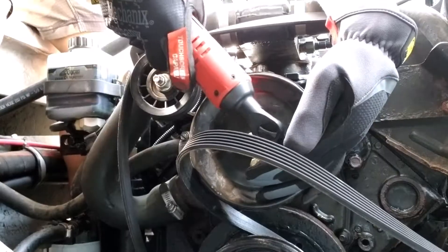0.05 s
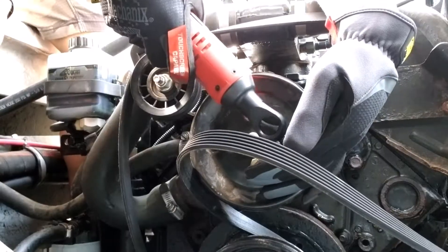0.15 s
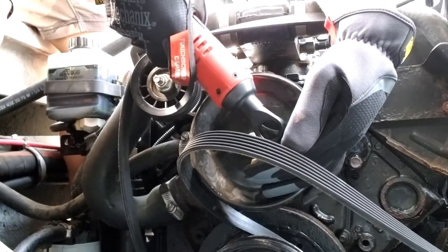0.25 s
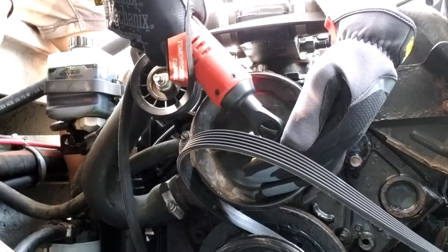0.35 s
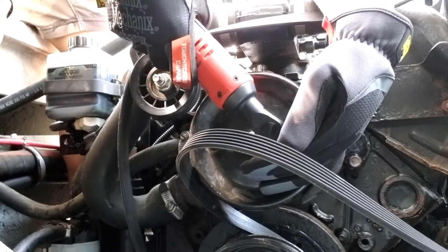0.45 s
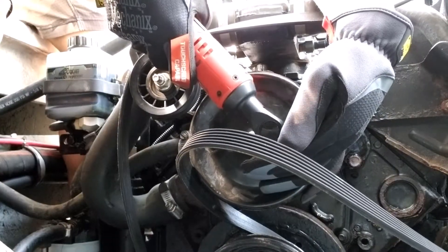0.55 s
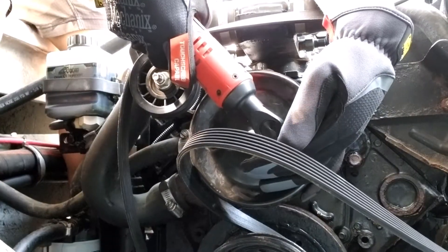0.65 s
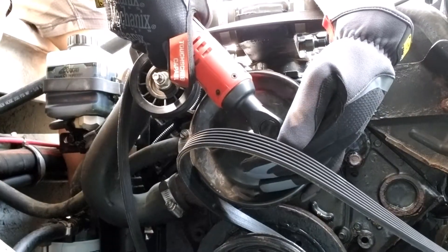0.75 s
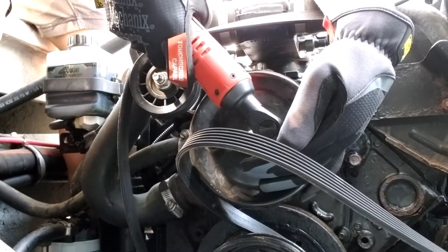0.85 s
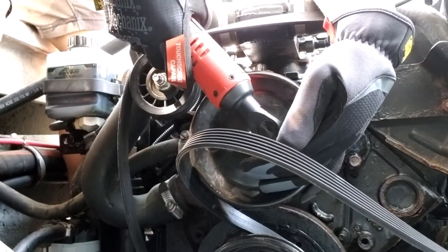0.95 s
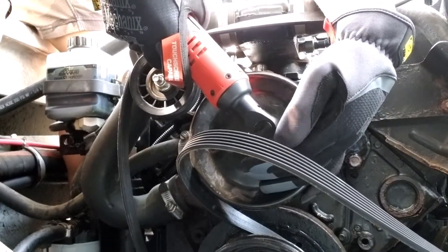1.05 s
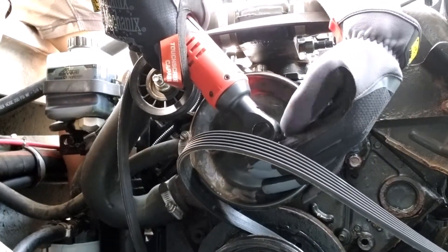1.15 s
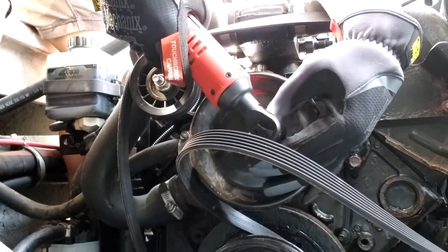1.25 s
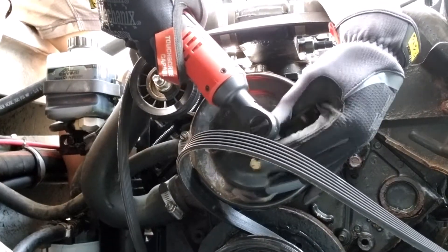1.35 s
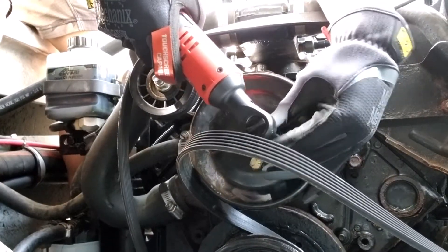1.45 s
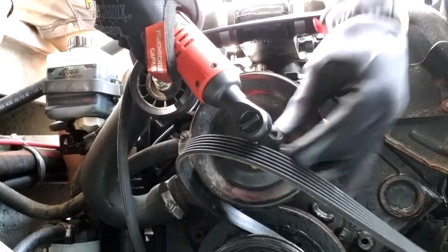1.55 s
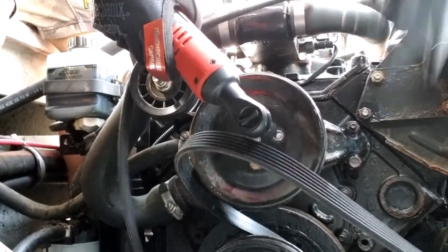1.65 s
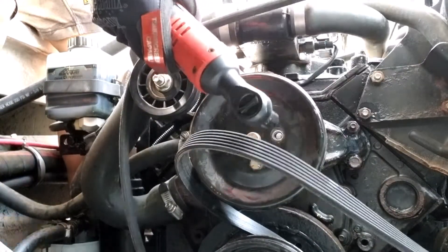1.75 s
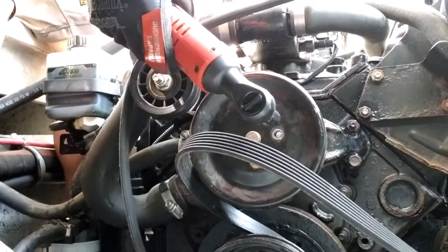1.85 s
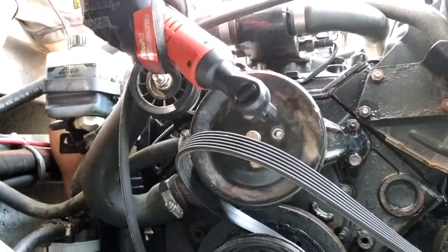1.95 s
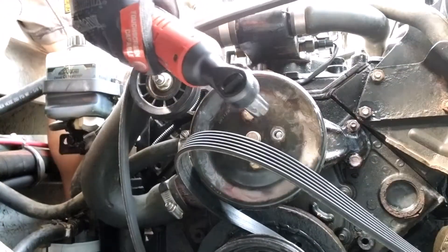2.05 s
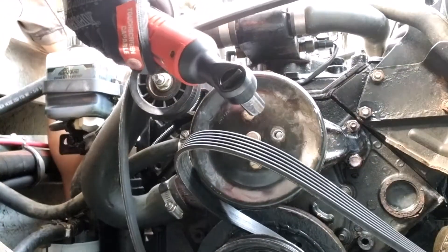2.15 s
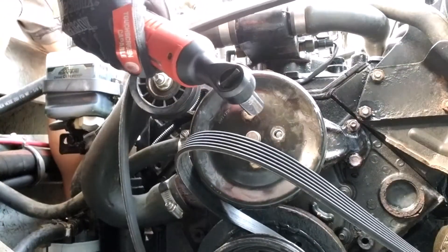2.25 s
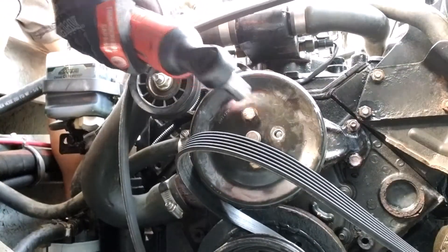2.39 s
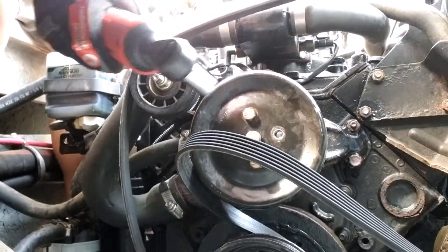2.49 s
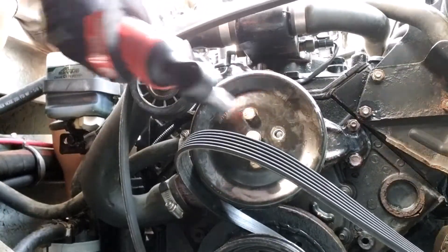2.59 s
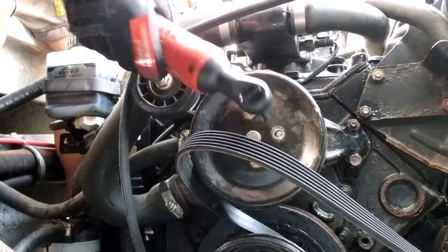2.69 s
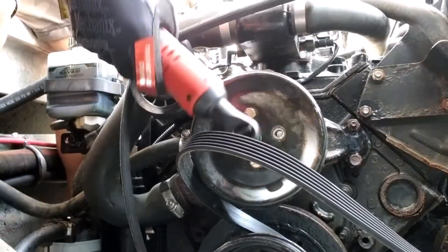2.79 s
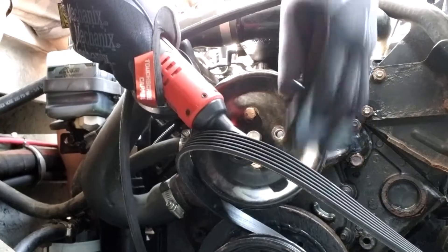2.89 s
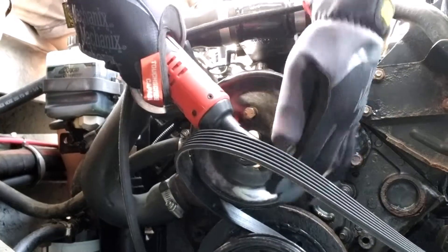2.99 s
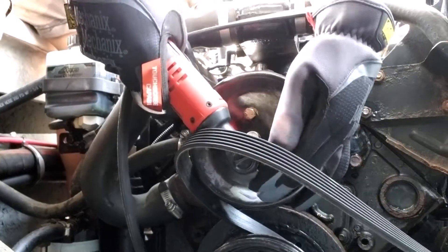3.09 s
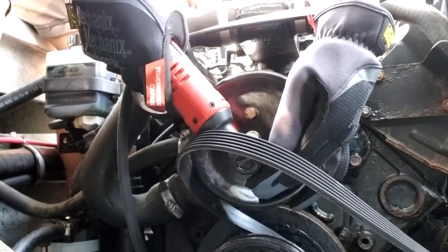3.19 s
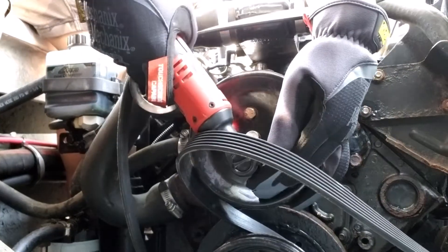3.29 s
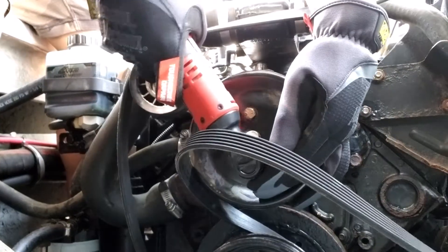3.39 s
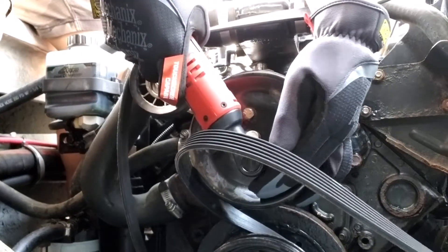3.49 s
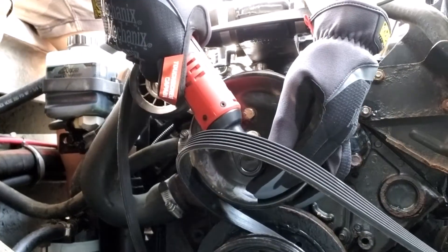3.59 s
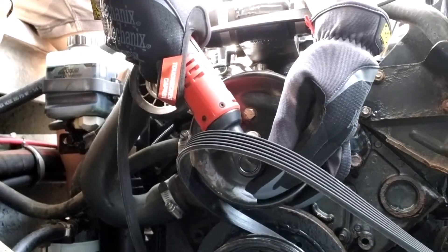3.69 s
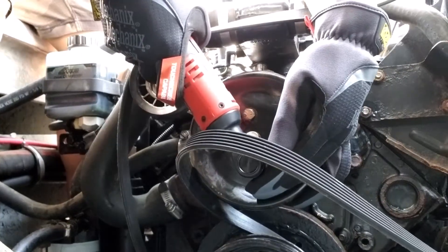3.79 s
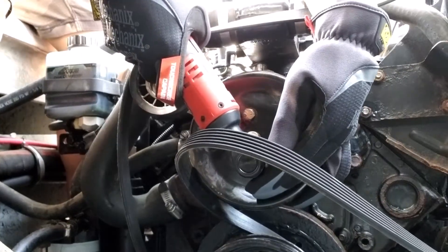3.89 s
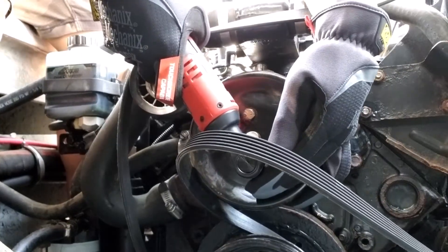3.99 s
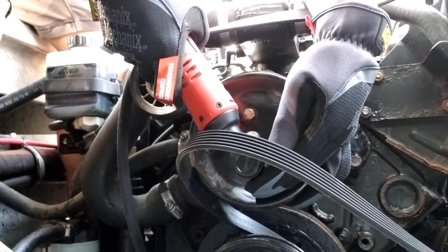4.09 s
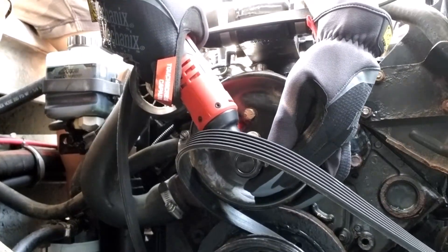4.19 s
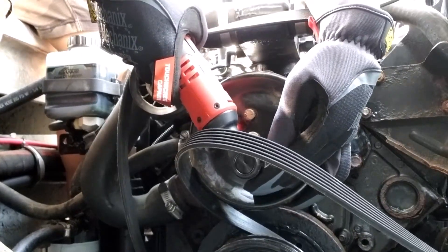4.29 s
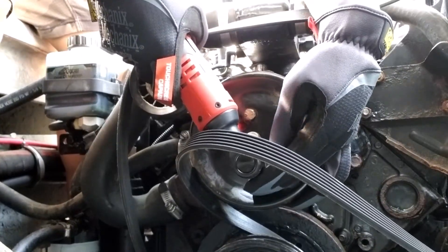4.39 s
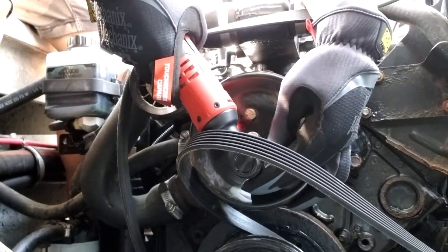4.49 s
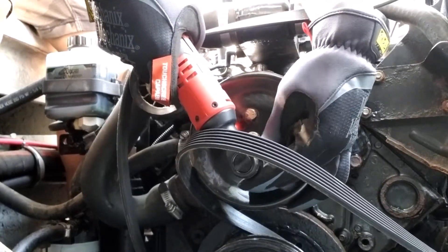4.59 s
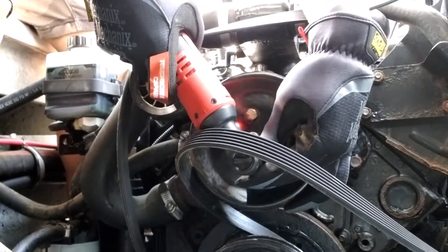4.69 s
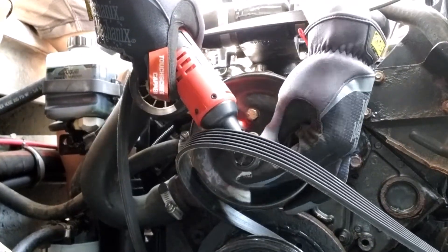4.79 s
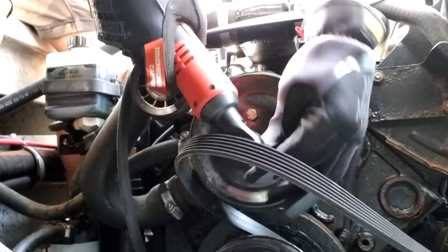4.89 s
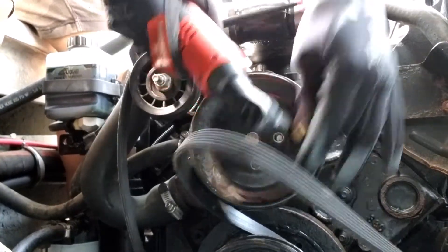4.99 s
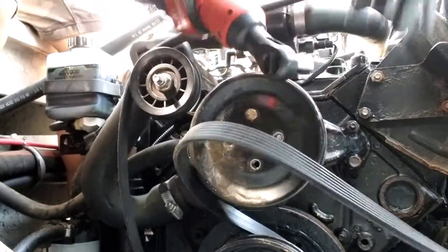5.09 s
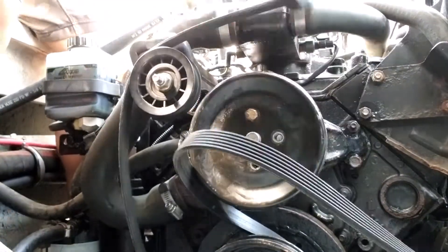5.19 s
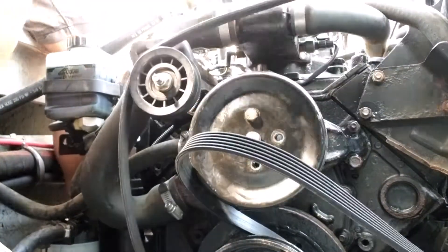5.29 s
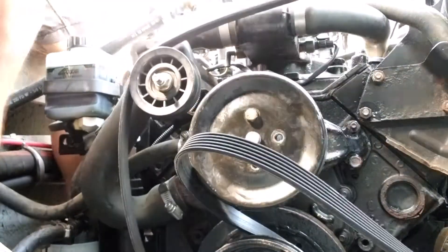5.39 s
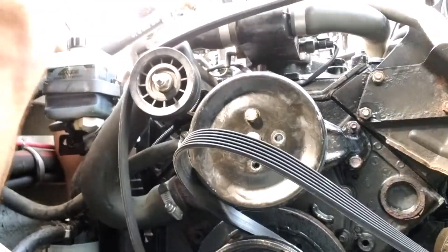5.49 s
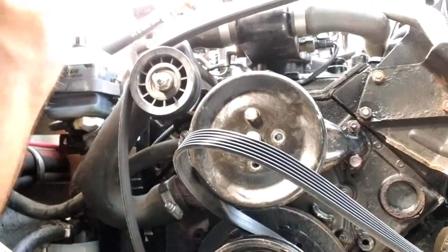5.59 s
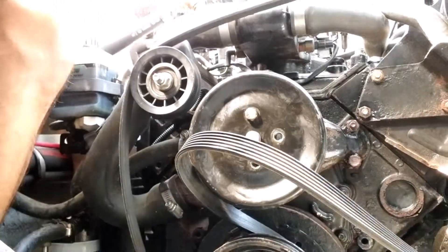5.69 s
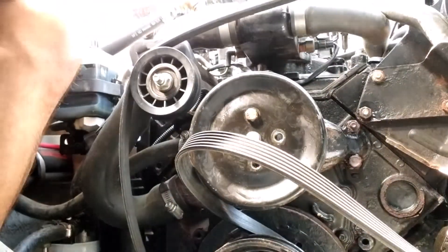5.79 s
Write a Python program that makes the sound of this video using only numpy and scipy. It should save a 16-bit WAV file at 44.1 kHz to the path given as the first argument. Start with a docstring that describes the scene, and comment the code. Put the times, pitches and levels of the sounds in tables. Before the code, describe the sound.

Steel taps, then a loud harsh ratchet whir coasting down in clicks; a pause with glove slides, then a second, longer run.

```python
"""Close in front of a stereo pair in a garage, a cordless ratchet spins two bolts out of an engine pulley.
Over room rumble and faint glove rustle the socket taps steel, the motor whines up, the bolt thumps loose.
The crank snaps the pawl twice a turn: a buzzing rattle with gritty clicks, single clicks as it coasts.
Then a knock on the pulley, glove slides, and the rumble swelling back as the gain control recovers.
More taps lead into a second, longer run, eased before it coasts down; taps and glove slides end the scene."""
import sys
import numpy as np
from scipy import signal
from scipy.fft import rfft, irfft
from scipy.io import wavfile
from scipy.ndimage import uniform_filter1d, minimum_filter1d

SR = 44100
rng = np.random.default_rng(int(sys.argv[2]) if len(sys.argv) > 2 else 0)


def wrap_up_sound(samples):
    """Save the sound to the file named by the first command line argument, as 16-bit audio."""
    columns = np.atleast_2d(samples).T
    # keep every value between -1 and 1, then stretch to whole-number steps
    tamed = np.clip(columns, -1, 1)
    steps = np.round(tamed * 32767).astype(np.int16)
    wavfile.write(sys.argv[1], SR, steps)


N = 257984
T = np.arange(N) / SR  # s

# garage rumble: (frequency [Hz], density [dB per Hz])
RUMBLE_SPECTRUM = [(20, -41.5), (40, -19.5), (75, -0.5), (200, -3.5), (290, -12.5), (500, -13),
                   (1000, -22.5), (2000, -39), (6500, -53.5), (9500, -50), (16000, -40.5)]
# standing waves of the garage and the gaps between them: (frequency [Hz], width [Hz], lift [dB])
ROOM_MODES = [(90, 40, 2), (153, 25, -8.5), (180, 11, 2), (218.7, 42, 4.5), (271, 29, -7), (326, 26, 6.5),
              (440, 10, 5), (482, 10, 7.5), (1070, 75, 2.5)]
# likeness of the rumble at the two microphones: (frequency [Hz], correlation [-1 to 1])
RUMBLE_LIKENESS = [(60, 0.98), (250, 0.98), (500, 0.92), (1000, 0.15), (2000, 0.88), (8000, 0.29)]
# rumble swells as the tool is carried to the next bolt and put away: (time [s], length [s], lift [dB])
TOOL_MOVES = [(2.383, 1.21, 4.5), (5.4, 0.61, 6.5)]
ROOM_DB = -46  # rumble level before the moves lift it

# glove cloth: (frequency [Hz], density [dB per Hz])
CLOTH_SPECTRUM = [(300, -17), (1500, 0), (2500, -2.5), (7000, -8), (8700, -3.5), (12000, -6), (16000, -26)]
# gloves sliding on tool and belt:
# (time [s], length [s], level [dB], treble tilt [dB per octave], unevenness [dB])
GLOVE_RUBS = [(2.402, 0.15, -57.5, 0.5, 3.5), (2.652, 0.17, -56.5, 9, 1.2), (2.87, 0.24, -62, 0.5, 1),
              (5.114, 0.052, -53.5, 4.5, -1.5), (5.434, 0.24, -52, -1, 3)]
RUB_ATTACK_S, RUB_RELEASE_S = .025, .02
GRIP_DB = -64  # the faint rustle of a steady grip

# difference at the pair for sounds on the tool's side: (frequency [Hz], left minus right [dB])
LEFT_MINUS_RIGHT = [(150, 1), (500, 3), (1000, .7), (2000, 3.8), (4000, 3.9), (8000, 6.9), (14000, 6.7)]

# socket taps and scrapes on steel, and gritty clicks from the bolt during the runs, levels before a common
# lift: (time [s], level [dB], treble tilt [dB per octave], 60 dB decay [s], time constant of the onset [s])
TAPS_AND_CLICKS = [(0.0881, -35.5, -5, 0.052, 0.00092), (0.16, -36, -5.5, 0.2, .008),
                   (0.226, -36.5, 1, 0.044, 0.00035), (.274, -33.5, -6.5, .04, .001),
                   (0.413, -18.5, 5, 0.14, .004), (.459, -8, -4, 0.076, .003),
                   (0.55, -17.5, -2, .025, .001), (3.0435, -25.5, 0, 0.027, .0003),
                   (3.1335, -26.5, -0.5, 0.046, 0.00027), (3.147, -30, -11.5, 0.037, 0.00089),
                   (3.357, -28.5, 1.5, 0.17, .03), (3.4079, -13, 4, 0.043, .0005),
                   (3.43, -21.5, 2, 0.25, .01), (3.506, -14.5, 2.5, .025, 0.0009),
                   (3.527, -14.5, 5.5, .04, .002), (3.561, -19, 0, .03, .001),
                   (3.831, -18.5, -2, 0.013, .0005), (3.953, -21.5, -3.5, 0.017, .0005),
                   (4.076, -19, 3, .02, 0.00041), (4.919, -42, 5, 0.032, .002),
                   (5.027, -32.5, 5, 0.084, .002), (5.608, -32.5, 4, 0.05, .006),
                   (5.795, -22.5, 3.5, 0.14, 0.0076)]
# colour of the taps and gritty clicks: (frequency [Hz], density [dB per Hz])
STEEL_SPECTRUM = [(150, -26), (400, -1), (880, -15), (1060, 10), (1350, 0.5), (1650, 4), (2500, -5.5),
                  (4300, -2), (6500, -5), (9000, -13), (13000, -15), (16000, -32.5)]

# motor winding up against the tight bolt:
# (time [s], length [s], start pitch [Hz], end pitch [Hz], level [dB])
WIND_UPS = [(0.403, 0.025, 3480, 3920, -39), (3.436, 0.049, 3775, 3965, -34.5)]

# one row a bolt: (pawl starts [s], time constant of its bite [s], last stroke [s],
# speed at that stroke [turns/s], friction [turns/s per s], time of one surge [s], surge spacing [crank turns])
BOLT_RUNS = [(.424, .002, 1.413, 8.7, 205, .89, 17.5), (3.473, .028, 4.7831, 23.3, 315, 3.955, 20.6)]
FULL_HZ, CATCH_HZ = 166.3, 70  # crank turns a second: flat out, and as the pawl catches
SPIN_UP_S, DRAG_S = .036, .42  # time constants of the motor and of the drag
STOP_S = .022  # the crank is at rest this long after its last stroke
# on the second bolt the trigger is let halfway out: time, target turns a second, time constant
EASE_AT_S, EASED_HZ, EASE_S = 4.28, 110, .11

# tool head and housing: (frequency [Hz], density [dB per Hz])
HEAD_SPECTRUM = [(100, -29), (550, -32), (800, -30), (1050, -14), (1400, -14), (1900, -10.5), (2550, -8.5),
                 (3100, -5), (4600, -5.5), (6200, -4.5), (7500, -5), (8700, 0), (11000, 0), (13000, 1),
                 (14500, -2), (16000, -5)]
# peaks and gaps of that head: (frequency [Hz], width [Hz], lift [dB])
HEAD_MODES = [(880, 100, -5), (1170, 80, 2), (1380, 60, -5), (1490, 90, 4), (1640, 160, 10), (1830, 80, 3),
              (1990, 60, 3), (2060, 50, -6), (2170, 80, 3), (2350, 110, 4), (2560, 70, -9), (2660, 80, 3),
              (2790, 110, -8), (3020, 200, 3), (3570, 110, -10), (3830, 250, 3), (4660, 170, -9),
              (5050, 300, 2), (5380, 140, -4), (5950, 300, 3), (6480, 200, 3), (8700, 220, 3)]
# ringing of the loose pawl and socket: (frequency [Hz], half-width [Hz], level [dB])
LOOSE_MODES = [(1655, 40, -10), (12880, 720, -4)]
RATTLE_DB = -14.5  # gain of the rattle at full speed, before load, surges and the tool head's lift
FORCE_EXPONENT = 1.7  # how steeply each snap grows with speed
SPRING_DB = -10.5  # however slow the crank, the spring snaps the pawl this hard, relative to full speed
BOUNCE_S, SCATTER_S, SCATTER_SHARE = .0008, .0045, .2  # decay of a snap: fast bounce, slower scatter
LOAD_DB, LOAD_RISE_S, LOAD_S = 2, .11, .025  # a tight bolt is louder: lift, build-up, release constant
SURGE_DB = .9  # how far the rattle swells as the socket wobbles

# gear hum: (multiple of the crank rate, level [dB], depth of beat [0-1])
HUM_ORDERS = [(1, 0, .4), (2, -4.5, .6), (3, -11, .5), (4, -6.5, .9), (5, -14, .8), (6, 6, .45), (7, 0, .5),
              (8, -5, .6), (9, -1.5, .6), (10, -3, .6), (11, -4, .5), (12, -4, .6), (13, -4.5, .5),
              (14, -6, .5), (16, -3, .5), (18, -2, .5), (19, -3, .5)]
HUM_DB = -25.5  # gain of the hum sum against the rattle gain
GEAR_TEETH, PINION_ORDER = 14, 52.7  # meshes per crank turn: reduction gear, motor pinion
FREE_WHINE_DB, FREE_GEAR_DB = -3.5, -1.5  # pinion and gear whine off the throttle, against the rattle gain
PINION_RING_HZ, PINION_RING_WIDTH_HZ = 6000, 600  # the coasting pinion is loudest near this pitch
GEAR_RING_HZ, GEAR_RING_WIDTH_HZ = 1430, 150  # the gear only sings as it passes this pitch

# churn of slack gears: (frequency [Hz], density [dB per Hz])
CHURN_SPECTRUM = [(100, -16), (650, -13), (950, -19), (1250, -7), (1600, 1), (2100, -2), (3200, 0),
                  (6500, -1), (8000, -6), (16000, -16)]
CHURN_EXPONENT = .7  # the churn dies slowly with speed
# gears knocking across their slack once a turn: (frequency [Hz], density [dB per Hz])
BACKLASH_SPECTRUM = [(50, -28), (130, -8), (260, -13), (420, -7), (580, -23), (870, -20), (1080, 2),
                     (1300, 3), (1600, 1), (1850, 3), (2400, -3), (4000, -14), (16000, -40)]
BACKLASH_DB, BACKLASH_EXPONENT = -37, 1  # gain at full speed before load; growth with speed
# rust cracking in the thread: mean cracks a second, mid level at full speed, 60 dB decay
GRIT_PER_S, GRIT_DB, GRIT_T60_S = 45, -22, .018

# dull thumps, the bolt breaking loose and knocks on the pulley:
# (time [s], level [dB], freedom to ring [dB], lowest pitch of the thud [Hz])
DULL_THUMPS = [(0.462, -13.5, -14, 378), (0.482, -21.5, -12, 300), (1.7168, -22.5, 8.5, 108.4),
               (3.145, -29, -16.5, 60), (3.41, -19, -1, 302), (3.44, -32.5, -2, 100),
               (4.871, -41.5, -25, 1000), (5.799, -39, 13, 100)]
# ringing of the pulley and its bracket: (frequency [Hz], level [dB], 60 dB decay [s])
PULLEY_MODES = [(152, -5, .26), (197, -1, .12), (250, -7, .07), (385, -7, .08), (480, -10, .05),
                (572, -6, .09), (615, -7, .07), (829, -13, .055), (1050, -15, .05), (1200, -13, .06),
                (1480, -21, .05), (1965, -28, .06)]
# dead thud of a thump: (frequency [Hz], density [dB per Hz])
THUD_SPECTRUM = [(25, -35), (60, -17.5), (170, -8), (600, -6.5), (780, -18.5), (1050, -9.5), (1300, -13),
                 (2200, -35.5), (8000, -38), (16000, -36)]

# socket singing on the bolt head: (time [s], length [s], pitch [Hz], width [Hz], level [dB])
SOCKET_RINGS = [(0.487, 0.016, 1033, 29.9, -24.5), (3.494, 0.036, 1657, 61, -28.5),
                (3.556, 0.024, 1643, 70, -28)]
# loosened bolt rocking in the socket, each snap ringing brightly:
# (time [s], length [s], pitch [Hz], half-width [Hz], gain against the rattle [dB])
BOLT_ROCKS = [(1.051, 0.022, 11000, 2540, 1), (1.11, .03, 13040, 400, 0), (1.229, .006, 12900, 400, 8),
              (1.347, 0.0091, 12900, 900, 3.5), (1.421, 0.0085, 12800, 400, 0),
              (4.329, 0.011, 11000, 2460, -0.5), (4.401, .028, 12700, 550, 0.5),
              (4.478, 0.017, 11800, 1600, 6.5), (4.573, 0.031, 12600, 500, 3)]
# single clacks of the pawl as it catches or drops into a tooth: (time [s], level [dB])
PAWL_CLACKS = [(1.2882, -4), (1.3574, -9), (1.413, -6.5), (1.4275, -12), (1.495, -28), (3.473, -1.5),
               (3.478, -1)]
EDGE_HZ = 16000  # top of the recorder's band


def amp(db):
    """Decibels to gain."""
    return 10 ** (np.asarray(db) / 20)


def evened(x):
    """Scales to rms 1."""
    return x / np.sqrt(np.mean(x ** 2) + 1e-20)


def read(points, hz):
    """Reads a spectrum on a log-frequency axis."""
    f, value = np.transpose(points)
    return np.interp(np.log(hz + 1), np.log(f + 1), value)


def peaks_db(modes, f):
    """Lift and loss in dB from a table of resonances and gaps."""
    return sum(db / (1 + (2 * (f - hz) / width) ** 2) for hz, width, db in modes)


def add(mix, s, sound):
    """Mixes a sound in at time s."""
    part = mix[..., round(s * SR):][..., :sound.shape[-1]]
    part += sound[..., :part.shape[-1]]


def convolve(x, response):
    """Passes one or two channels through a mono or stereo response."""
    return signal.fftconvolve(np.atleast_2d(x), np.atleast_2d(response), axes=1)[:, :x.shape[-1]]


def colour(db_at, size=2048):
    """Causal (minimum-phase) response of energy 1 with the given dB spectrum."""
    log_gain = np.log(amp(db_at(abs(np.fft.fftfreq(size, 1 / SR)))))
    response = np.fft.ifft(np.exp(np.conj(signal.hilbert(log_gain)))).real
    return response / np.linalg.norm(response)


def resonance(hz, width):
    """Response of energy 1 that rings at one pitch."""
    return colour(lambda f: -20 * np.log10(1 + ((f - hz) / width) ** 2))


def drift(hz, size=16384):
    """Slow chance of rms 1: noise that falls away above the given rate."""
    low_pass = 1 + (np.fft.rfftfreq(size, T[-1] / size) / hz) ** 4
    slow = irfft(rfft(rng.standard_normal(size)) / low_pass)
    return np.interp(T, np.linspace(0, T[-1], size), evened(slow))


def swell(start, length, attack_s, release_s):
    """Linear attack, hold, exponential release that begins at start + length."""
    attack = np.clip((T - start) / attack_s, 0, 1)
    return attack * np.exp(-np.maximum(T - start - length, 0) / release_s)


def echoes(t60, size=16000):
    """Dense reflections of energy 1, different at each microphone."""
    t = np.arange(size) / SR
    tail = rng.standard_normal((2, size)) * amp(-60 * t / t60) * (1 - np.exp(-t / (t60 / 60)))
    return tail / np.linalg.norm(tail, axis=1, keepdims=True)


def in_garage(x, room_db, room_t60):
    """Direct sound and a short room tail."""
    return x + amp(room_db) * convolve(x, echoes(room_t60))


def from_left(x, lead_s=.00007):
    """Places a source nearer the left microphone: the right hears it later and differently coloured."""
    hz = np.fft.rfftfreq(N, 1 / SR)
    half_db = read(LEFT_MINUS_RIGHT, hz) / 2
    left = amp(half_db)
    right = amp(-half_db) * np.exp(-2j * np.pi * hz * lead_s)
    return irfft(rfft(x) * np.array([left, right]), N)


def garage():
    """Low rumble shaped by standing waves, alike at both microphones by band, stronger with tool moves."""
    hz = np.fft.rfftfreq(N, 1 / SR)
    left, other = rfft(rng.standard_normal((2, N)))
    alike = np.clip(read(RUMBLE_LIKENESS, hz), -1, 1)
    right = alike * left + np.sqrt(1 - alike ** 2) * other
    spectrum = amp(read(RUMBLE_SPECTRUM, hz) + peaks_db(ROOM_MODES, hz))
    noise = irfft(np.array([left, right]) * spectrum, N)
    moving_db = sum(db * swell(s, length, attack_s=.022, release_s=.058) for s, length, db in TOOL_MOVES)
    return evened(noise) * amp(ROOM_DB + moving_db + drift(21))


def cloth(tilt, uneven_db):
    """Cloth friction as noise in uneven grains, tilted in treble."""
    grains = rng.standard_normal((2, N)) * amp(uneven_db * (drift(300) + drift(30)))
    weave = colour(lambda f: read(CLOTH_SPECTRUM, f) + tilt * np.log2((f + 1) / 4000))
    return evened(convolve(grains, weave))


def gloves():
    """Cloth rustles faintly in a steady grip and slips in uneven grains with each slide."""
    rustle = amp(GRIP_DB) * cloth(tilt=0, uneven_db=2.0)
    for s, length, db, tilt, uneven_db in GLOVE_RUBS:
        shape = swell(s, length, RUB_ATTACK_S, RUB_RELEASE_S)
        rustle = rustle + amp(db) * shape * cloth(tilt, uneven_db)
    return rustle * amp([[1], [-1]])  # left +1 dB, right -1 dB


def taps_and_clicks(lift_db=15, size=11000):
    """Socket taps and scrapes on steel, and gritty clicks from the bolt: decaying noise, sharp or soft."""
    out, t = np.zeros((2, N)), np.arange(size) / SR
    for s, db, tilt, length, onset_s in TAPS_AND_CLICKS:
        grains = rng.standard_normal((2, size)) * rng.exponential(1, size)
        burst = grains * amp(-60 * t / length) * (1 - np.exp(-t / onset_s))
        steel = colour(lambda f: read(STEEL_SPECTRUM, f) + tilt * np.log2(np.maximum(f, 600) / 3000))
        add(out, s, amp(db + lift_db) * convolve(burst / np.linalg.norm(burst[0]), steel))
    return from_left(in_garage(out, room_db=-6, room_t60=.11))


def wind_up(overtone_db=-4, gear_db=-10):
    """A short rising whine of pinion and gear as the motor winds up."""
    out = 0
    for s, length, from_hz, to_hz, db in WIND_UPS:
        pitch = np.interp(T, [s, s + length], [from_hz, to_hz])
        phase = 2 * np.pi * np.cumsum(pitch) / SR + .9 * drift(400)
        pinion = np.sin(phase) + amp(overtone_db) * np.sin(2 * phase)
        gear = amp(gear_db) * np.sin(phase * GEAR_TEETH / PINION_ORDER)
        out = out + amp(db) * swell(s, length, .01, .005) * (pinion + gear)
    return from_left(out)


def crank_speed(start, last, last_hz, friction):
    """Turns a second: the motor spins up, follows the trigger, then coasts against friction and drag."""
    driven = FULL_HZ - (FULL_HZ - CATCH_HZ) * np.exp(-np.maximum(T - start, 0) / SPIN_UP_S)
    if start < EASE_AT_S < last:
        eased = 1 - np.exp(-np.maximum(T - EASE_AT_S, 0) / EASE_S)
        driven = driven - (FULL_HZ - EASED_HZ) * eased
    coasting = (last_hz + friction * DRAG_S) * np.exp((last - T) / DRAG_S) - friction * DRAG_S
    return np.clip(coasting, 0, driven)


def snaps(turns, at, scatter_db, jitter_s, size=400):
    """One click each time the crank passes the angle at, a little uneven in size and time."""
    chance = rng.standard_normal((size, 2))
    when = np.flatnonzero(np.diff(np.floor(turns - at)) > 0)[:size]
    sizes, slips = chance[:len(when)].T
    slipped = when + np.round(slips * jitter_s * SR).astype(int)
    out = np.zeros(N)
    np.add.at(out, np.clip(slipped, 0, N - 1), amp(scatter_db * sizes))
    return out


def chatter(clicks, share, split_hz=3500):
    """Parts bounce after each snap: lows stay more a pulse, highs a short rattle at each microphone."""
    def smear(seconds):
        r = np.exp(-1 / (seconds * SR))
        return signal.lfilter([1 - r], [1, -r], clicks ** 2 + 1e-20)
    power = (1 - SCATTER_SHARE) * smear(BOUNCE_S) + SCATTER_SHARE * smear(SCATTER_S)
    bounces = np.sqrt(power) * rng.standard_normal((2, N))
    hz = np.fft.rfftfreq(N, 1 / SR)
    loose = np.clip(share, 0, 1) * (1 - .7 / (1 + (hz / split_hz) ** 4))
    return irfft(np.sqrt(1 - loose) * rfft(clicks) + np.sqrt(loose) * rfft(bounces), N)


def pawl_snaps(turns, speed, return_db=-1):
    """Two snaps a crank turn; the pawl drops back later in the turn at speed."""
    return_at = .11 + .19 * speed / FULL_HZ
    stroke = snaps(turns, 0, 1.5, .00003)
    drop_back = amp(return_db) * snaps(turns, return_at, 2, .00005)
    return chatter(stroke + drop_back, .975) * np.sqrt(SR / speed / 2)  # evens power across click rates


def tooth_skips():
    """At speed the pawl also skips over the teeth: many tiny bright clicks, random in time and size."""
    skips = (rng.random(N) < 1800 / SR) * amp(4.5 * rng.standard_normal(N))
    bursts = np.sqrt(signal.lfilter([1], [1, -.9], skips + 1e-12)) * rng.standard_normal((2, N))
    return evened(signal.lfilter(*signal.butter(1, 3000, "high", fs=SR), bursts))


def gear_hum(turns, socket):
    """Multiples of the crank rate; each wavers with the backlash and beats as the socket wobbles."""
    turns = turns + .012 * drift(50)  # backlash, in turns
    hum = 0
    for k, db, depth in HUM_ORDERS:
        beat_phase = socket + 1.2 + k / 10 * drift(3)
        beat = np.sqrt(1 + depth ** 2 + 2 * depth * np.cos(beat_phase))
        waver = 1 + .35 * drift(30)
        tone = np.cos(2 * np.pi * (k * turns + rng.random()) + .55 * drift(16))
        hum = hum + amp(db) * beat * waver * tone
    return hum


def gear_tones(turns, socket, speed, slack, mesh, whine_db=-22):
    """Hum under power, and pinion and gear whine that changes as the gears go slack."""
    pace = speed / FULL_HZ
    hum = gear_hum(turns, socket) * np.minimum(pace, 1) ** 18  # steep: only near full speed
    whine = (1 + .5 * drift(40)) * np.cos(2 * np.pi * PINION_ORDER * turns + .3 * drift(100))
    gear_sings = 1 / (1 + ((GEAR_TEETH * speed - GEAR_RING_HZ) / GEAR_RING_WIDTH_HZ) ** 2)
    gear = (1 + .7 * drift(45)) * mesh * gear_sings
    pinion_sings = 1 / (1 + ((PINION_ORDER * speed - PINION_RING_HZ) / PINION_RING_WIDTH_HZ) ** 2)
    free = amp(FREE_WHINE_DB) * pinion_sings * whine + amp(FREE_GEAR_DB) * gear
    freewheel = slack ** 2 * pace ** 1.5 * free  # fades as the motor slows
    return amp(HUM_DB) * hum + amp(whine_db) * (1 - slack) * whine + freewheel


def motor_run(start, bite_s, last, last_hz, friction, surge_at, surge_turns,
              teeth_db=-1, churn_db=-31, wobble=.004):
    """Pawl, teeth, gears and motor follow one crank; the rattle grows with speed, load and surges."""
    speed = crank_speed(start, last, last_hz, friction)
    speed = np.maximum(speed * (1 + wobble * speed / FULL_HZ * drift(25)), 1e-3)
    pace = speed / FULL_HZ
    on = uniform_filter1d(1. * ((T > start) & (T < last + STOP_S)), 50)
    turns = np.cumsum(speed * on) / SR
    turns = turns - np.interp(last, T, turns)  # the last stroke falls on a whole turn
    socket = 2 * np.pi * (turns - np.interp(surge_at, T, turns)) / surge_turns

    load_db = LOAD_DB * swell(start, LOAD_RISE_S, LOAD_RISE_S, LOAD_S)
    snap = amp(SPRING_DB) + (1 - amp(SPRING_DB)) * pace ** FORCE_EXPONENT
    bite = 1 - .85 * np.exp(-np.maximum(T - start, 0) / bite_s)
    gain = amp(RATTLE_DB + load_db + SURGE_DB * np.cos(socket))
    level = on * bite * snap * np.sqrt(pace) * gain

    teeth_gain = amp(teeth_db) * pace ** 1.2
    blend = (pawl_snaps(turns, speed) + teeth_gain * tooth_skips()) / np.sqrt(1 + teeth_gain ** 2)
    rattle = level * blend * amp(.5 * drift(25))  # the socket sits unevenly on the bolt

    slack = np.clip(4 * (1 - pace) - .05, 0, 1)  # off the throttle the loose pawl and gears ring freely
    mesh = np.cos(2 * np.pi * GEAR_TEETH * turns + .5 * drift(60))
    churn_gain = on * bite * slack * pace ** CHURN_EXPONENT * amp(churn_db)
    churn = churn_gain * (1 + .7 * mesh) * rng.standard_normal((2, N))
    clunks = chatter(snaps(turns, .55, 3, .0003), .9, split_hz=300) * np.sqrt(SR / speed)
    backlash = on * bite * clunks * pace ** BACKLASH_EXPONENT * amp(BACKLASH_DB + load_db)
    tones = level * gear_tones(turns, socket, speed, slack, mesh)
    return rattle, rattle * slack, churn, backlash, on * bite * pace, tones


def grit(force, count=14, size=1500):
    """Rust cracks in the thread: sparse clicks, each kind with a pitch of its own."""
    t, out = np.arange(size) / SR, np.zeros((2, N))
    for hz in np.geomspace(1200, 6500, count) * rng.uniform(.93, 1.07, count):
        tone_and_noise = np.sin(2 * np.pi * hz * t) + .6 * rng.standard_normal((2, size))
        crack = amp(-60 * t / GRIT_T60_S) * tone_and_noise
        crack = crack / np.linalg.norm(crack[0])
        for at in np.flatnonzero(rng.random(N) < GRIT_PER_S / count / SR):
            add(out, at / SR, force[at] * amp(GRIT_DB + rng.uniform(-7, 5)) * crack)
    return out


def housing(spectrum):
    """A broad spectrum with the peaks and gaps of the tool's head."""
    return colour(lambda f: read(spectrum, f) + peaks_db(HEAD_MODES, f))


def ratchet(metal_db=3, loose_db=-11.5):
    """Both runs sound through the tool's head; gears knock and churn and loose parts ring as it coasts."""
    runs = [motor_run(*row) for row in BOLT_RUNS]
    rattle, ringing, churn, backlash, force, tones = map(sum, zip(*runs))
    rattle = rattle + clacks()
    loose_ring = sum(amp(db) * resonance(hz, width) for hz, width, db in LOOSE_MODES)
    metal = convolve(rattle, housing(HEAD_SPECTRUM)) + convolve(churn, housing(CHURN_SPECTRUM))
    metal = metal + amp(loose_db) * convolve(ringing, loose_ring) + rocking(rattle)
    knocking = convolve(backlash, colour(lambda f: read(BACKLASH_SPECTRUM, f))) + grit(force)
    return from_left(in_garage(amp(metal_db) * metal + knocking, room_db=-7, room_t60=.09) + tones)


def thumps(thud_db=21, thud_t60=.086, size=14000):
    """The bolt breaking loose and knocks on the pulley: low ringing modes over a dead thud."""
    out, t = np.zeros((1, N)), np.arange(size) / SR
    ring = sum(amp(db - 60 * t / t60) * np.sin(2 * np.pi * hz * t) for hz, db, t60 in PULLEY_MODES) / 2
    ring *= 1 - np.exp(-t / .0006)  # soft onset
    for s, db, ring_db, low_hz in DULL_THUMPS:
        dull = colour(lambda f: read(THUD_SPECTRUM, f) - 10 * np.log10(1 + (low_hz / (f + 20)) ** 4))
        thud = amp(thud_db) * convolve(echoes(thud_t60, size=size)[0], dull) / 2
        add(out, s, amp(db) * (amp(ring_db) * ring + thud))
    return in_garage(out, room_db=-9, room_t60=.2)


def socket_rings(attack_s=.0029, release_s=.0037):
    """The socket rubs on the bolt head and one of its resonances sings up briefly."""
    out = 0
    for s, length, hz, width, db in SOCKET_RINGS:
        phase = 2 * np.pi * hz * T
        narrow_noise = drift(width) * np.cos(phase) + drift(width) * np.sin(phase)
        out = out + amp(db) * swell(s, length, attack_s, release_s) * narrow_noise
    return from_left(in_garage(out, room_db=-7, room_t60=.1))


def rocking(rattle, size=4096):
    """While the loose bolt rocks, each snap of the pawl sets the socket ringing."""
    out = np.zeros((2, N))
    for s, length, hz, width, db in BOLT_ROCKS:
        part = slice(round(s * SR), round(s * SR) + size)
        random_signs = rng.choice([-1, 1], (2, size))
        drive = rattle[:, part] * random_signs * swell(s, length, .002, .004)[part]
        add(out, s, amp(db) * convolve(drive, resonance(hz, width)))
    return out


def clacks():
    """The pawl drops into a tooth as the crank starts or stops: single clicks with a bounce."""
    clicks = np.zeros(N)
    for s, db in PAWL_CLACKS:
        add(clicks, s, amp([db]))
    return chatter(clicks, .87)


def scene():
    """The tool, far louder than all else, over handling sounds and the room."""
    return garage() + gloves() + taps_and_clicks() + wind_up() + ratchet() + thumps() + socket_rings()


def record(dry, threshold_db=-17, hold_s=1.077, recover_db_per_s=12):
    """Gain control ducks at once, holds, and recovers slowly; then the band limit."""
    power_db = 10 * np.log10(abs(uniform_filter1d((dry ** 2).mean(0), 700)) + 1e-12)
    over_db = np.maximum(power_db - threshold_db, 0)
    half = int(hold_s * SR / 2)
    # the largest overshoot within the past hold time
    held = -minimum_filter1d(-over_db, 2 * half + 1, origin=half, mode="constant")
    fall = T * recover_db_per_s
    duck_db = uniform_filter1d(np.maximum.accumulate(held + fall) - fall, 200)
    edge = signal.firwin(511, EDGE_HZ, window=("kaiser", 9), fs=SR)
    return signal.oaconvolve(dry / amp(duck_db), edge[None], "same")


dry = scene()
out = record(dry)
wrap_up_sound(out)
```